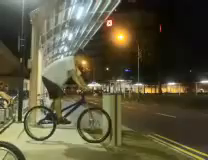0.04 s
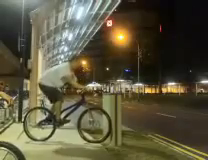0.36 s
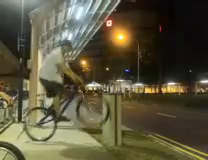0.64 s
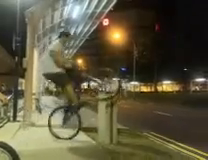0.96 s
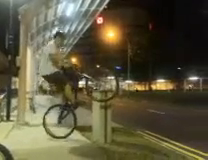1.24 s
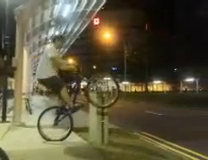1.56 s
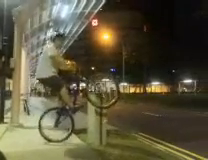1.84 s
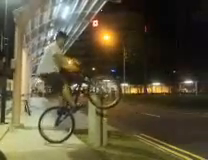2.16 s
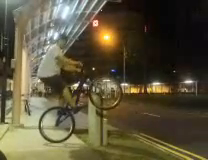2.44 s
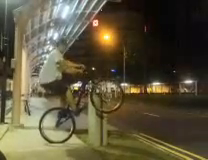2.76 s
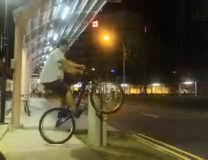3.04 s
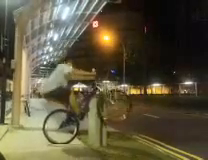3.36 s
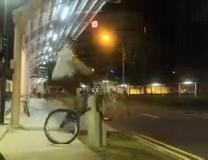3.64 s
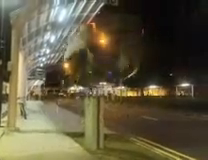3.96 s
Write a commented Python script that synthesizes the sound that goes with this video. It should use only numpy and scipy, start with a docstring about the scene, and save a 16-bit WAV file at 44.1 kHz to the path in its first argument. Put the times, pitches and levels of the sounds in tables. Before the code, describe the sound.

Bicycle brakes snap on and spring back in sharp, ringing metallic clicks, often in pairs. Small parts tick between them, and a tyre squeaks once and later scuffs softly, over a low city drone with a slight echo.

```python
"""A low city drone is heard first, at night; over it a trials rider balances a bicycle on its back wheel, front
wheel on a roadside post. The brakes snap on and spring back about 0.1 s later, each impact exciting the modes
of the metal. Small parts tick, and the brake pads squeak faintly on the rim; a tyre scuffs, and chirps once by
stick-slip. A walkway roof reflects the bicycle's sounds, and the loudest snaps overload the microphone."""
import sys
import numpy as np
from scipy import signal
from scipy.fft import rfft, irfft
from scipy.io import wavfile
from scipy.ndimage import uniform_filter1d, minimum_filter1d

SR = 44100
rng = np.random.default_rng(int(sys.argv[2]) if len(sys.argv) > 2 else 0)


def store_wav(level_fs):
    """Save 16-bit WAV to argv[1]."""
    pcm = np.round(np.clip(np.atleast_2d(level_fs), -1, 1) * 32767)
    wavfile.write(sys.argv[1], SR, pcm.T.astype(np.int16))


N = 176400
HIT_N = 16384  # samples in one impact
TIME, FREQ, HIT_FREQ = np.arange(N) / SR, np.fft.rfftfreq(N, 1 / SR), np.fft.rfftfreq(HIT_N, 1 / SR)


def undb(db):
    """Amplitude ratio of a level in decibels."""
    return 10 ** (np.asarray(db) / 20)


def unit(x):
    """Normalisation to rms 1."""
    return x / np.sqrt(np.mean(x ** 2))


def unit_hit(x):
    """Normalisation of a transient to the energy of 10 ms at rms 1."""
    return x / np.sqrt(np.sum(x ** 2) / (SR / 100))


def add(out, start_s, x):
    """Superposition of x on out from a given time."""
    i = int(start_s * SR)
    out[i:i + len(x)] += x[:len(out) - i]


def gain_at(hz, points):
    """Gain of a spectral envelope (f/Hz, level/dB), interpolated in log frequency."""
    f, db = np.array(points, float).T
    return undb(np.interp(np.log(hz + 1), np.log(f), db))


def colour(x, gain):
    """Minimum-phase filtering: folding the cepstrum makes the given gain curve causal."""
    cepstrum = irfft(np.log(gain + 1e-4))
    cepstrum[1:len(x) // 2] *= 2
    cepstrum[len(x) // 2 + 1:] = 0
    return irfft(rfft(x) * np.exp(rfft(cepstrum)))


def wander(rate_hz):
    """Random modulation: steps at the given rate, smoothed twice, at rms 1."""
    hold = int(SR / rate_hz)
    steps = np.repeat(rng.standard_normal(N // hold + 1), hold)
    return unit(uniform_filter1d(uniform_filter1d(steps, hold), hold)[:N])


def resonant_noise(hz, width_hz):
    """Random excitation of one resonance gives narrow-band noise, here at rms 1."""
    detuning = (FREQ - hz) / (0.72 * width_hz)
    return unit(irfft(rfft(rng.standard_normal(N)) / (1 + detuning ** 2), N))


# spectrum of distant traffic: f/Hz, relative level/dB
TRAFFIC_SPECTRUM = [(20, -3.5), (28, 1.5), (40, -3.5), (60, -0.5), (80, -3), (160, 1), (220, -1.5),
                    (340, -11.5), (680, -11.5), (850, -15), (1100, -13.5), (1750, -17.5), (2050, -23),
                    (4200, -30), (5600, -30.5), (6200, -37.5), (7100, -37), (7800, -52.5), (8800, -41.5)]
# resonances of distant machinery and traffic, and a thin high hiss: f/Hz, width/Hz, level/dB
CITY_DRONES = [(28.5, 5, -38.5), (54, 7.2, -41), (128.4, 10.7, -25.5), (453, 24, -44), (715.5, 18, -45),
               (5450, 310, -52.5)]


def city():
    """Incoherent sources sum to noise whose octaves swell together and flicker alone; resonances drone."""
    swell_db = 0.4 * wander(2.4)
    highpass = FREQ ** 2 / (FREQ ** 2 + 14 ** 2)
    spectrum = rfft(rng.standard_normal(N)) * gain_at(FREQ, TRAFFIC_SPECTRUM) * highpass
    octave = np.clip(np.log2((FREQ + 1) / 20), 0, 9)
    traffic = np.zeros(N)
    for k in range(10):
        band = irfft(spectrum * np.maximum(1 - abs(octave - k), 0), N)
        flicker_db = 0.7 * wander(12)
        traffic += band * undb(swell_db + flicker_db)
    drones = sum(undb(db) * resonant_noise(hz, width) for hz, width, db in CITY_DRONES)
    return undb(-27) * unit(traffic) + drones


# reflections from pavement, wall and roof: delay t/s, level/dB
REFLECTIONS = [(.0062, -21), (.0165, -15), (.0355, -19)]


def walkway(direct):
    """Convolution with an impulse response adds discrete echoes and exponentially decaying reverberation."""
    t = np.arange(SR) / SR
    build_up = 1 - np.exp(-t / .006)
    response = np.zeros(SR)
    for db, t60 in ((-12.5, .14), (-13.5, .49)):  # scatter from the posts, tail under the roof
        tail = rng.standard_normal(SR) * np.exp(-np.log(1000) * t / t60) * build_up
        response += undb(db) * tail / np.linalg.norm(tail)
    for delay, db in REFLECTIONS:
        response[int(delay * SR)] += undb(db)
    return direct + signal.fftconvolve(direct, response)[:N]


# faint squeaks of the brake pads on the rim: centre t/s, level/dB, f/Hz, half-length t/s
PAD_SQUEAKS = [(1.302, -36.5, 5200, 0.011), (1.721, -37.5, 5300, 0.013), (2.137, -38, 5250, 0.015),
               (2.181, -38, 5000, 0.0089), (2.533, -36.5, 5470, 0.011), (3.198, -37, 5300, 0.0043),
               (3.217, -36, 5300, 0.0055), (3.602, -36, 5570, 0.011), (3.695, -39, 4800, 0.026),
               (3.832, -39, 5000, 0.02), (3.96, -34, 4800, 0.035)]


def pad_chirps():
    """Friction excites one high resonance under a Gaussian envelope, so there is no hard attack."""
    return sum(undb(db) * np.exp(-((TIME - centre) / half) ** 2) * resonant_noise(hz, width_hz=610)
               for centre, db, hz, half in PAD_SQUEAKS)


# scuffs of the back tyre on the pavement: centre t/s, level/dB, half-length t/s
TYRE_SCUFFS = [(2.878, -36, 0.038), (2.97, -31.5, 0.033), (3.283, -26, 0.036)]
# spectrum of rubbing rubber: f/Hz, relative level/dB
RUBBER_SPECTRUM = [(120, -18.5), (250, 1), (360, 4.5), (540, -4), (730, -2), (1200, -14), (2200, -29),
                   (5000, -48)]


def tyre_scuffs():
    """Sliding friction of the loaded tread on concrete makes soft swells of grainy noise."""
    grit = rng.standard_normal(N) * undb(4 * wander(300))
    rub = unit(irfft(rfft(grit) * gain_at(FREQ, RUBBER_SPECTRUM), N))
    swells = sum(undb(db) * np.exp(-((TIME - centre) / half) ** 2) for centre, db, half in TYRE_SCUFFS)
    return rub * swells


def tyre_squeak(peak_s=.962, hz=810, rise_s=.018, fall_s=.008):
    """Stick-slip oscillation of rubber gives a short, raspy tone with a weak second harmonic."""
    t = TIME - peak_s
    pitch = hz * (1 + 0.022 * wander(400))
    phase = 2 * np.pi * np.cumsum(pitch) / SR
    envelope = np.exp(-np.where(t < 0, t / rise_s, t / fall_s) ** 2)
    rasp = undb(3 * wander(500))
    return undb(-18.5) * envelope * rasp * (np.sin(phase) + undb(-15.5) * np.sin(2 * phase))


def chatter(length_s, decay_s=0.0023):
    """Contact force of rebounding parts: grainy noise that halves over length_s, then dies away."""
    t = np.arange(HIT_N) / SR
    grains = np.repeat(undb(4 * rng.standard_normal(HIT_N // 32)), 32)
    envelope = np.exp(-.7 * np.minimum(t / length_s, 1) - np.maximum(t - length_s, 0) / decay_s)
    return rng.standard_normal(HIT_N) * grains * envelope


def ring(force, modes, focus_hz, lift_db):
    """Modal superposition; the point of impact favours the mode nearest focus_hz, if within 250 Hz."""
    nearest = min(abs(hz - focus_hz) for hz, _, _ in modes)
    out = 0
    for hz, db, t60 in modes:
        detuned_hz = hz * (1 + .001 * rng.standard_normal())
        pole = np.exp((2j * np.pi * detuned_hz - np.log(1000) / t60) / SR)
        vibration = unit_hit(signal.lfilter([1], [1, -pole], force).imag)
        favoured = abs(hz - focus_hz) <= min(nearest, 250)
        out = out + undb(db + lift_db * favoured) * vibration
    return unit_hit(out)


# modes of lever and frame: f/Hz, relative level/dB, T60/s
LEVER_FRAME_MODES = [(1838, -2, 0.045), (2285, -12.5, 0.026), (3020, -0.5, 0.032), (3260, -6.5, 0.049),
                     (3360, -5.5, 0.15), (3610, -1, 0.12), (3960, -5, 0.094)]


def frame_ring(force, focus_hz, lift_db):
    """Damped vibration of lever and frame gives the pitched part of a clack."""
    return ring(force, LEVER_FRAME_MODES, focus_hz, lift_db)


# modes of the brake metal: f/Hz, relative level/dB, T60/s
BRAKE_MODES = [(4590, -9.5, 0.22), (4760, 1.5, 0.15), (4780, -6, .06), (4865, -3, .04), (5020, -1, 0.023),
               (5380, -2.5, 0.13), (6220, -13.5, 0.15), (6300, -10, 0.14), (7100, -6.5, 0.075),
               (8360, -14, 0.027)]


def brake_ring(force, focus_hz=0, lift_db=0):
    """Damped vibration of the brake metal gives a short, bright ring."""
    return ring(force, BRAKE_MODES, focus_hz, lift_db)


# creaks and ticks of levers, chain and frame: t/s, level/dB, centre f/Hz, length t/s
LIGHT_CONTACTS = [(0.3783, -28.5, 3270, .014), (.5525, -33, 3800, 0.0047), (0.669, -34.5, 3420, 0.015),
                  (.9280, -24.5, 2440, 0.0081), (1.0347, -21.5, 2900, 0.018), (1.2560, -30.5, 5140, .008),
                  (1.482, -38, 3000, 0.0039), (1.495, -27.5, 4000, 0.012), (1.886, -29.5, 3000, .003),
                  (1.902, -23, 4470, .008), (2.2824, -34, 2000, 0.004), (2.2984, -28, 2590, 0.0084),
                  (2.3180, -32, 2260, 0.01), (2.359, -33.5, 3620, 0.013), (2.389, -34.5, 3200, .008),
                  (2.4308, -38.5, 2930, 0.0094), (2.5346, -34, 2840, 0.0043), (2.668, -28.5, 2930, 0.017),
                  (2.768, -36.5, 3060, .006), (3.3335, -30.5, 1680, 0.0037), (3.3510, -26, 2450, 0.0044),
                  (3.433, -28, 4250, .016), (3.668, -34.5, 2700, 0.014), (3.8560, -32.5, 3200, .006),
                  (3.876, -33, 4800, 0.0082), (3.9357, -24, 3300, 0.0077)]


def ticks():
    """Light contacts radiate a dry band of noise and weakly excite the brake's modes."""
    out = np.zeros(N)
    lowpass = 1 / (1 + (HIT_FREQ / 6000) ** 10)
    for start, db, hz, length in LIGHT_CONTACTS:
        force = chatter(length)
        octaves_off = np.log2((HIT_FREQ + 1) / hz)
        scratch = unit_hit(colour(force, lowpass / (1 + octaves_off ** 2)))
        add(out, start, undb(db) * (scratch + undb(-6) * brake_ring(force)))
    return out


# spectra of the low, middle and high contact noise: f/Hz, relative level/dB
KNOCK_SPECTRUM = [(100, -22), (300, -4.5), (900, -0.5), (1700, 3.5), (2300, 0), (4000, -42.5)]
CLACK_SPECTRUM = [(1200, -16), (2200, -13.5), (3000, -4), (4000, -3), (5200, 4), (7000, -27)]
CRACK_SPECTRUM = [(4000, -17.5), (5300, -4.5), (6200, 8.5), (7100, 0), (7700, -21), (8600, -11.5),
                  (10000, -18)]
# brakes closing and springing back: t/s, ring level/dB, favoured f/Hz, its lift/dB,
# knock level/dB, relative clack level/dB, crack level/dB, chatter length t/s
BRAKE_SNAPS = [(.4040, -13.5, 4730, 3, -30, -24.5, -18.5, 0.0052),
               (0.494, -28, 4800, 7, -43, -29.5, -32, 0.0041),
               (.9600, -26, 4572, 12, -33, -29.5, -37.5, 0.017),
               (1.0550, -2, 5024, 19.5, -15.5, -22.5, -23, 0.0086),
               (1.1552, -15, 5024, 10.5, -26.5, -29.5, -28.5, 0.0058),
               (1.5072, -18.5, 2965, 7.5, -24.5, -14, -24.5, 0.013),
               (1.6, -16, 4830, 11, -33, -28, -32, 0.0068), (1.9089, -3, 4940, 7, -20, -13.5, -11.5, .010),
               (2.004, -40, 4715, 7, -26.5, -23.5, -25.5, 0.0083),
               (2.6831, -16.5, 4825, 11.5, -33, -20.5, -26.5, 0.0078),
               (2.7825, -28, 4825, 8, -44, -37.5, -40, 0.0081),
               (3.3564, -21.5, 2965, 10, -26, -14, -19.5, 0.0088),
               (3.4517, -15.5, 5024, 8, -34, -24, -24, 0.0046)]


def brake_snaps():
    """Impact excitation: an impulse and its rebounds ring brake and frame amid bursts of contact noise."""
    out = np.zeros(N)
    for start, ring_db, focus_hz, lift_db, knock_db, clack_db, crack_db, length in BRAKE_SNAPS:
        force = 0.13 * chatter(0.73 * length)  # rebounds
        force[0] += 1  # first contact
        add(out, start, undb(ring_db) * brake_ring(force, focus_hz, lift_db))
        add(out, start, undb(clack_db - 5.5) * frame_ring(force, focus_hz, lift_db))
        bands = (knock_db, KNOCK_SPECTRUM), (clack_db - 0.5, CLACK_SPECTRUM), (crack_db, CRACK_SPECTRUM)
        for db, spectrum in bands:
            burst = colour(chatter(length), gain_at(HIT_FREQ, spectrum))
            add(out, start, undb(db) * unit_hit(burst))
    return out


def scene():
    """Superposition of the bicycle, reverberating under the roof, and the city behind it."""
    bicycle = brake_snaps() + ticks() + pad_chirps() + tyre_squeak() + tyre_scuffs()
    return (walkway(bicycle) + city())[None]


def limiter(x, threshold_db=4, attack_s=.0006, release_s=0.054):
    """Peak limiting: the gain drops for any peak over the threshold and recovers exponentially."""
    recovery = TIME / release_s
    excess = np.log(np.maximum(abs(x) / undb(threshold_db), 1))
    gain = np.exp(recovery - np.maximum.accumulate(excess + recovery, axis=-1))
    window = int(attack_s * SR)
    return x * uniform_filter1d(minimum_filter1d(gain, window), window)


def record(dry, onset_s=0.1262, ceiling_db=-.7, cutoff_hz=8750):
    """Overload: peaks are limited and saturate; the sound cuts in at onset_s and is low-pass filtered."""
    limited = limiter(dry)
    saturated = limited / (1 + abs(limited / undb(ceiling_db)) ** 6) ** (1 / 6)
    fade_in = np.clip((TIME - onset_s) / .005, 0, 1)
    lowpass = signal.ellip(10, .2, 70, cutoff_hz, fs=SR, output="sos")
    return signal.sosfilt(lowpass, saturated * fade_in)


dry = scene()
out = record(dry)
store_wav(out)
```